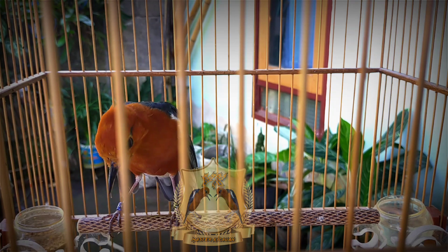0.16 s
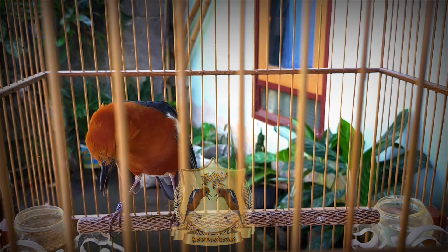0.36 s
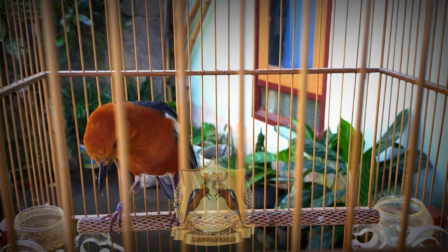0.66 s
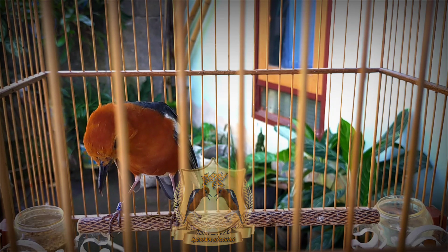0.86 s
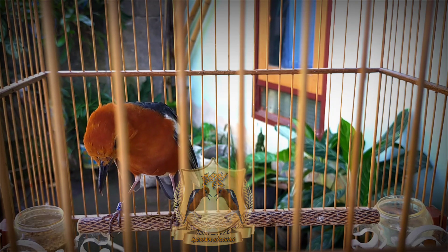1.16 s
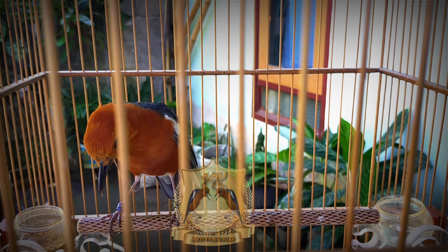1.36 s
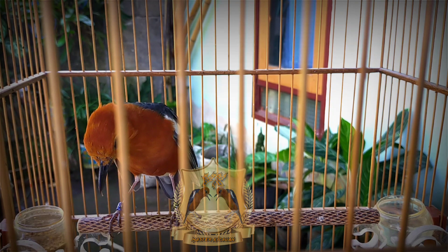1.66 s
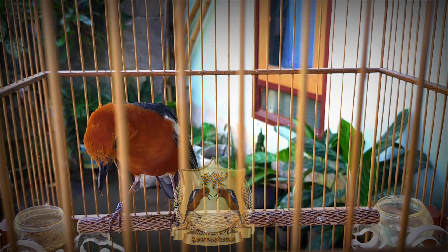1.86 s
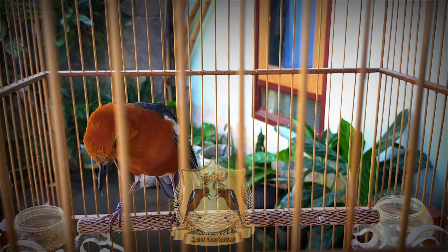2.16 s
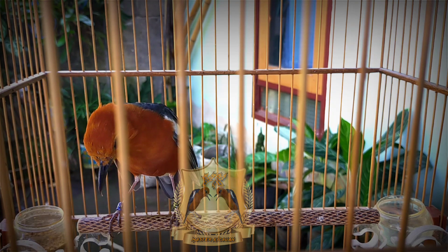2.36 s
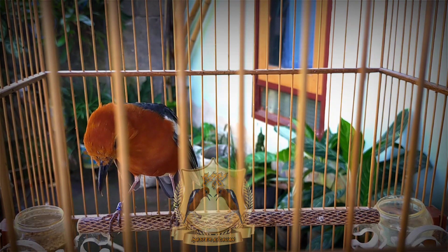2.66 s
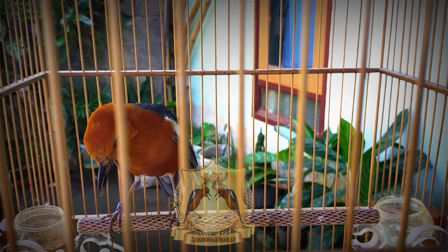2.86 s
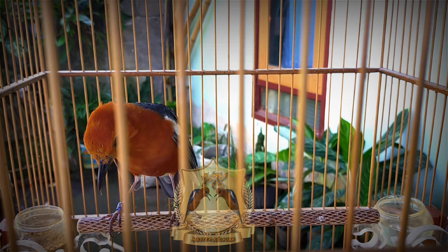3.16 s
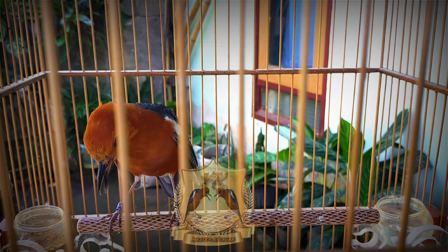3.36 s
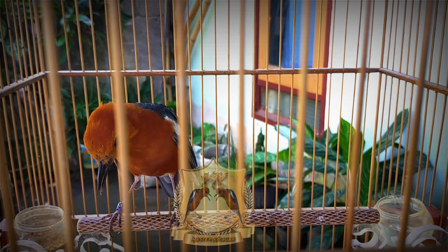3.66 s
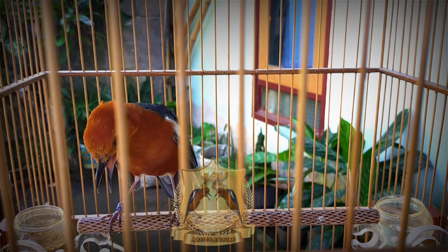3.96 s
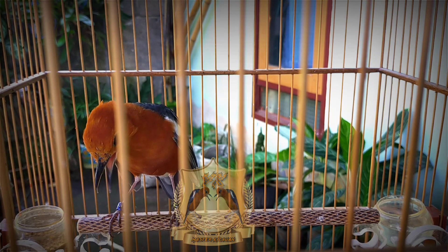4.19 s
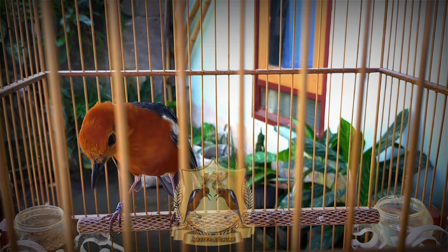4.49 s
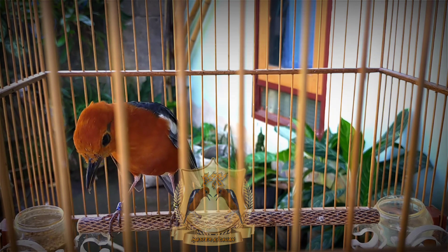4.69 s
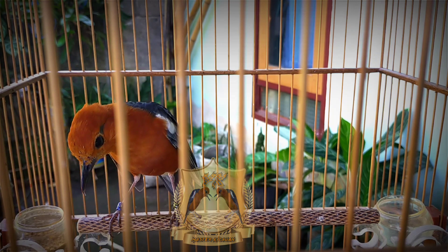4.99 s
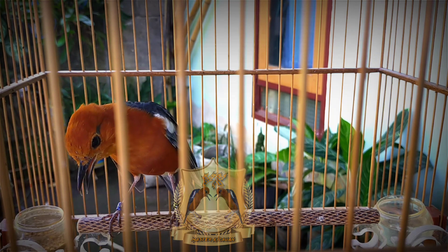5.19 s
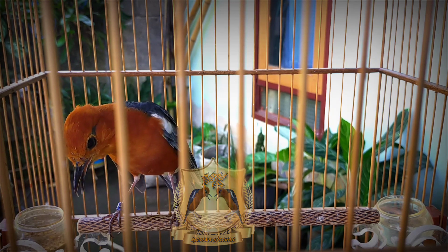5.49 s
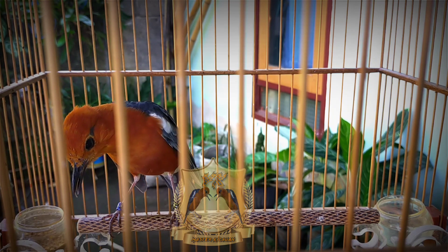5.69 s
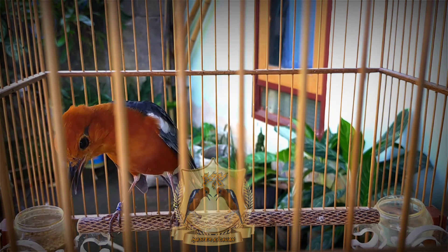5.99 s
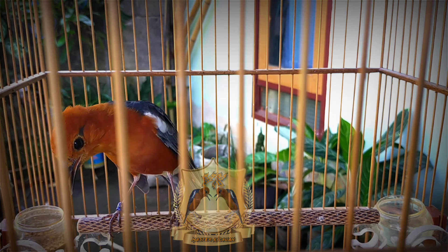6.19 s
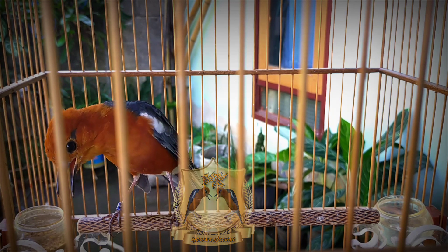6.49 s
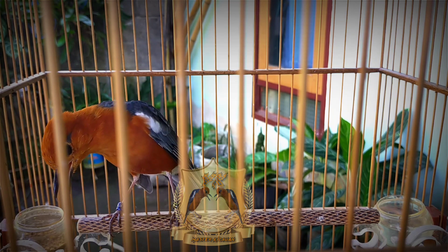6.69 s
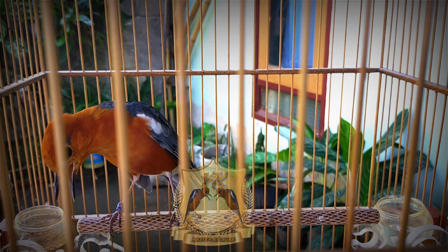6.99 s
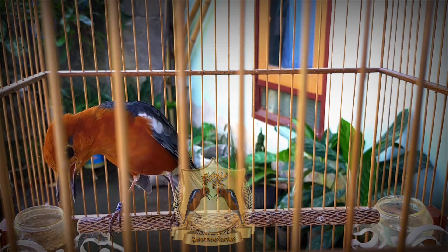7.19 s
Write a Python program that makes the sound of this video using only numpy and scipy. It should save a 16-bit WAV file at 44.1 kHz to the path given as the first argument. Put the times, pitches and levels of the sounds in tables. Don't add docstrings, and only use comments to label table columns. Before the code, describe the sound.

A caged thrush gives one long falling whistle, rests, then sings loud rapid glides and a churring trill over distant roosters and birds.

```python
import sys
import numpy as np
from scipy import signal
from scipy.fft import rfft, irfft
from scipy.io import wavfile
from scipy.ndimage import uniform_filter1d, minimum_filter1d

SR = 44100
rng = np.random.default_rng(int(sys.argv[2]) if len(sys.argv) > 2 else 0)


def how_loud(loudness_db):
    steps = np.asarray(loudness_db, float) / 20
    return 10 ** steps


def file_out(sig):
    cols = np.atleast_2d(sig).T
    lim = np.clip(cols, -1, 1)
    pcm = np.round(lim * 32767).astype(np.int16)
    wavfile.write(sys.argv[1], SR, pcm)


N = 323694

# time in seconds, pitch in Hz, level in dB.
WHISTLE = [(0, 7140, -20), (.042, 6840, -19), (.058, 6810, -11.5), (.116, 6420, -13.5), (.192, 6100, -22),
           (.206, 6030, -12), (.272, 5800, -12.5), (.35, 5670, -19), (.4, 5640, -36)]

# start in seconds, length in seconds,
# first pitch in Hz, second pitch in Hz, level in dB.
SWOOPS = [(2.903, .042, 2777, 6650, -14)]
GRACE_NOTES = [(3.063, 0.021, 6070, 7627, -9), (3.442, 0.017, 8520, 6360, -29),
               (4.02, 0.011, 5350, 6330, -33), (4.187, .01, 7030, 7510, -20),
               (4.351, .008, 7250, 6850, -21), (4.371, .01, 5200, 5650, -33),
               (5.24, 0.014, 3700, 4200, -30), (6.434, 0.011, 8060, 7750, -35.5),
               (6.435, 0.0079, 2950, 2500, -41.5), (6.445, 0.0027, 8200, 7720, -8.5),
               (6.491, 0.0042, 7170, 8085, -13), (6.47, 0.021, 2360, 2450, -52)]
HUMPS = [(3.441, 0.043, 3230, 4937, -13.5)]
DOMES = [
    (3.545, .029, 6300, 7330, -11),
    (3.641, .029, 6500, 7520, -13),
]
STAIRS = [(3.82, .055, 1520, 5870, -14)]
DROPS = [
    (3.904, .015, 3350, 1550, -14),
    (4.076, .013, 4000, 1900, -17),
    (4.251, .015, 3150, 1700, -13),
]
PIPS = [(3.926, .015, 1580, 1660, -32)]
LIFTS = [
    (3.987, .024, 2450, 3800, -9),
    (4.672, .017, 2600, 3650, -9),
    (6.468, .021, 3640, 3660, -11),
]
CLIMBS = [
    (4.159, .029, 2150, 5300, -10),
    (4.326, .026, 2300, 5000, -10),
]
WAVERS = [(4.689, .044, 3305, 3870, -22)]
FALLS = [
    (5.174, .06, 6050, 3300, -5),
    (5.561, .052, 7050, 3300, -7),
]
SLIDES = [
    (5.262, .063, 5800, 3200, -14),
    (5.36, .06, 6500, 3200, -15),
]
SLANTS = [(5.648, .058, 5850, 3200, -14)]
MURMURS = [(5.849, 0.027, 1600, 3340, -37)]
ARCHES = [(5.919, 0.027, 4260, 5300, -12.5)]
HOOKS = [
    (6.04, 0.035, 6900, 4520, -7),
    (6.197, 0.038, 7620, 4700, -7),
]
SCOOPS = [(6.433, .06, 4854, 5790, -11)]
BOUNCES = [
    (6.491, .036, 4050, 4600, -22),
    (6.527, .041, 3700, 4450, -23),
    (6.568, .049, 3370, 4400, -17),
    (6.617, .045, 3000, 4350, -23),
]
TRILL = [
    (6.72, .034, 2550, 1720, -15.5),
    (6.843, .037, 2350, 1680, -15.5),
    (6.967, .036, 2250, 1720, -15.5),
    (7.098, .037, 2400, 1720, -15.5),
]
TAPERS = [(7.247, .043, 2400, 2000, -16)]
# start in seconds, length in seconds,
# first pitch in Hz, second pitch in Hz, level in dB.
SAGS = [
    (5.921, 0.096, 3833, 2230, -19),
    (6.043, .077, 4040, 2192, -16),
    (6.2, 0.079, 4113, 2377, -20.5),
]
# start in seconds, length in seconds, first pitch in Hz, second pitch in Hz, level in dB.
HIGH_GLIDES = [(5.204, .028, 7950, 6800, -17), (5.585, .014, 7900, 7400, -29),
               (6.741, .016, 8000, 7600, -24), (6.858, .022, 8000, 7500, -25),
               (6.981, .022, 8000, 7650, -23), (7.111, .026, 7950, 7700, -20)]

# share of the length, share of the way from first to
# second pitch, level in dB.
SWOOP = [(0, 0, -14), (.1, .15, 0), (.3, .48, 0), (.42, .56, -2), (.6, .84, 0), (1, 1, -2)]
GRACE = [(0, 0.31, -13.5), (0.3, 0.71, 1.5), (1, 1, -6.5)]
HUMP = [(0, 0, -17), (0.169, 0.94, -10), (.4, 1, -2), (1, 0.49, -13.5)]
DOME = [(0, 0, -10), (.1, .6, 0), (.3, 1, -1), (.5, .85, -5), (.75, .1, -11), (1, -1, -20)]
STAIR = [(0, 0, -10), (.18, .23, 4), (.33, .36, 0), (.52, .335, -1), (.64, .46, -10), (.76, .53, -5),
         (1, 1, 6)]
DROP = [(0, 0, -5), (.25, .1, 0), (1, 1, -6)]
GLIDE = [(0, 0, -14), (.2, .3, 0), (.6, .62, -2), (1, 1, -14)]
RISE = [(0, 0, -9), (.22, .58, 1), (.5, .76, -7), (1, 1, -8)]
CLIMB = [(0, 0, -6), (.2, .32, 1), (.44, .43, -6), (.75, .56, -8), (1, 1, -4)]
WAVER = [(0, .5, -4), (.07, -.2, -4), (.18, .45, 1), (.32, -.55, 0), (.48, -.45, -2), (.61, .1, 0),
         (.8, .6, -1), (.9, .93, 2), (1, .3, -12)]
FALL = [(0, .08, -3), (.08, .02, 1.5), (.25, .49, 0), (.45, .71, -5), (.7, .9, -15), (1, 1, -26)]
SLIDE = [(0, 0, -16), (.15, .5, -6), (.27, .66, 0), (.52, .78, 0), (.75, .9, -10), (1, 1, -20)]
SLANT = [(0, 0, -10), (.25, .3, 0), (.45, .58, 0), (.65, .7, -3), (1, 1, -18)]
LIFT = [(0, 0, -11), (.14, 0.28, -7), (0.329, 0.46, 4.5), (.62, 0.8, -11.5), (0.998, 0.88, 13)]
ARCH = [(0, -0.38, -37.5), (0.118, 0.84, -4), (0.299, 0.96, 0.5), (0.601, .8, -18), (0.998, -0.19, -14)]
HOOK = [(0, 0.051, -5.5), (.27, .37, -3.5), (0.599, .43, -5.5), (1.001, 0.91, -21)]
SAG = [(0, 0, -6.5), (0.118, -0.24, 3.5), (0.288, .17, -1), (0.548, .65, -10), (0.998, 0.98, -5.5)]
SCOOP = [(0, .1, -20), (.11, .92, 0), (.3, .17, -5), (.53, -.05, -11), (.8, 0, -6), (.9, .25, -3),
         (1, -.8, -12)]
BOUNCE = [(0, .2, -10), (.08, 0, -13), (.3, .02, -12), (.52, .75, -2), (.8, .82, 0), (.88, 1.08, 0),
          (1, -.1, -8)]
CHURR = [(0, 0, 0), (.18, .33, 1), (.5, .52, 0), (.7, .68, 0), (1, 1, -8)]
TAPER = [(0, 0, -3), (.07, .12, 0), (.3, .5, -6), (.55, .82, 0), (.9, .92, 0), (1, 1, -10)]
FAR_CALL = [(0, 0, -2), (.45, .65, -3), (1, 1, -10)]

# source strength in dB,
# loss in dB per octave away from the favoured pitch.
CLEAR = (4300, [(0, .1)])
HOLLOW = (7500, [(-4, .1), (-30, 18)])
NASAL = (7800, [(4, 22), (0, 95)])
REEDY = (6720, [(-29, 4.5), (2.5, 35.4), (2, 60), (-13, 28)])
BUZZY = (6870, [(-9, 11.9), (8.5, 40.6), (-3, 15), (-8, 3.3)])
OPEN = (6370, [(0, 28.5), (.1, 28)])
SOFT = (6700, [(7.5, 5), (5, 6.3), (-7.5, 10)])
THROATY = (6460, [(-2, .1), (-4.5, 64)])
BRASSY = (6000, [(-12, .1), (-20, .1), (-2, .1), (0, .1), (-6, .1)])
PINCHED = (6900, [(-23, 5), (0, 35), (-2, 45), (-12, 28)])
HUSKY = (7200, [(-4, .1), (-26, 60)])

# time in seconds, peak in dB.
TICKS = [(2.903, -15.5), (3.9908, -19), (4.163, -19), (4.3225, 5), (4.67, 5.5), (5.173, 5), (5.9184, 17.5),
         (6.718, 1), (6.8445, 12.5), (6.9663, -5), (7.1043, -14.5)]

# onset in seconds, 60 dB decay time in seconds, level in dB.
NEAR_ECHO = (0.0012, 0.075, -7)
YARD_ECHO = (0.029, 0.39, -8)
FAINT_ECHO = (0.011, 0.38, -16.5)

# frequency in Hz, density in dB per Hz.
HUM_SPECTRUM = [(12, -40.5), (20, -1), (99, -16), (247, -9.5), (465, -12), (833, -7.5), (1160, -12),
                (1570, -17), (1740, -16), (2610, -27), (3200, -28), (3630, -27.5), (7390, -8.5),
                (8600, -16), (11200, -56.5), (18900, -120)]
# time in seconds, level in dB.
HUM_LEVEL = [(0, -49), (3.4, -46.5), (6.5, -49), (6.8, -42), (7.34, -45)]
# time in seconds, level in dB.
GUSTS = [(0, -76), (.7, -55.5), (2, -55), (2.45, -61), (3.5, -54.5), (4, -69.5), (7.34, -76.5)]
# start in seconds, peak in dB, frequency in Hz.
PUFFS = [
    (1.467, -31, 58.4),
    (1.618, -29, 40.3),
    (2.347, -31, 43.8),
]
# time in seconds, level in dB.
HOARSE_LEVEL = [(0, -49), (.1, -47.5), (.3, -47), (.55, -47.5), (.72, -51), (.78, -64)]
# multiple of the fundamental, level in dB.
HOARSE_PARTIALS = [(2, -6.5), (3, -6.5), (4, -11), (5, -8), (6, -25)]
# start in seconds, length in seconds, depth in dB.
DUCKS = [(0, 0.18, 12), (2.895, 0.12, 8.5), (3.064, 0.14, 21), (3.539, 0.12, 25), (3.652, 0.092, 25),
         (3.827, 0.1, 9), (4.018, 0.086, 15), (4.181, 0.084, 16), (4.335, 0.07, 23), (4.671, 0.095, 25.5),
         (5.921, 0.11, 18), (6.039, 0.14, 7.5), (6.195, 0.11, 9), (6.488, 0.094, 15)]
# start in seconds,
# peak in dB.
CRACKS = [(0, -28), (3.082, -45), (3.654, -42), (3.817, -31), (4.004, -36), (4.022, -39), (4.178, -33.5),
          (4.334, -40), (4.345, -38)]

# start in seconds, length in seconds, first pitch in Hz,
# second pitch in Hz, level in dB.
FAR_BIRDS = [(.12, 0.14, 4250, 3205, -51), (.41, 0.11, 4140, 3120, -50.5), (.686, 0.046, 5800, 3190, -46),
             (.69, 0.03, 4410, 4360, -48), (.78, 0.087, 3320, 4150, -52.5),
             (.945, 0.077, 4890, 4950, -41.5), (1.01, 0.081, 4560, 4330, -42.5),
             (1.06, .07, 4400, 4720, -45), (1.11, 0.08, 4870, 4970, -39), (1.19, 0.041, 4970, 4580, -47.5),
             (1.225, 0.089, 4350, 4194, -51.5), (1.69, 0.14, 3070, 2670, -61.5),
             (1.87, 0.14, 3324, 3295, -55), (5.09, 0.1, 4360, 3510, -46.5)]
# time in seconds, pitch in Hz, level in dB.
FAINT_CROW = [(1.159, 1510, -67.5), (1.42, 1510, -68), (1.472, 1604, -61), (1.85, 1617, -55.5),
              (2.169, 1540, -69), (2.501, 1575, -61.5), (2.899, 1515, -64)]
# start in seconds, length in seconds,
# first pitch in Hz, second pitch in Hz, level in dB.
CROW_TOP = [
    (3.96, 0.03, 1150, 1148, -48.5),
    (4.09, 0.071, 1233, 1152, -50.5),
    (4.42, .18, 1217, 1206, -52),
    (4.85, 0.21, 1197, 1186, -52.5),
]
# time in seconds, pitch in Hz, level in dB, then second and third
# partial in dB relative to the first.
CROW = [(4.24, 744, -66, 0.5, -14), (4.299, 745, -55, 6, -7), (4.371, 745, -60, -12, -18),
        (4.48, 743, -54, 2.5, -12), (4.56, 758, -52, 7, -6.5), (4.65, 776.2, -36.5, -12.5, -21.5),
        (4.76, 770.4, -55, -3.5, -3), (4.862, 773, -49, -12.5, -11.5), (4.941, 752, -51, -3, -26),
        (5.009, 735.5, -43, -4.5, -12), (5.098, 693.7, -39, -14, -21), (5.202, 692.7, -37, -18, -30),
        (5.261, 683, -43.5, -6, -30), (5.309, 674.5, -56.5, 5, -3.5), (5.42, 634, -52, -2, -9)]


def in_time(rows):
    s, *columns = np.transpose(rows)
    return [np.interp(np.arange(N) / SR, s, column) for column in columns]


def drift(rate_hz):
    pole = np.exp(-2 * np.pi * rate_hz / SR)
    noise = rng.standard_normal(N + SR)
    slow = signal.lfilter([1], [1, -2 * pole, pole * pole], noise)[SR:]
    return slow / slow.std()


def notes(tables, wobble, flutter_db, rate, fourth_db=2.0, edge_s=0.0011):
    out, waver, flutter = np.zeros(N), drift(rate), drift(rate)
    release_s = max(edge_s, 0.003)
    for rows in tables:
        s, hz, *levels = np.transpose(rows)
        if len(levels) == 3:
            levels.append(levels[-1] + fourth_db)
        at = np.arange(int(s[0] * SR), min(int(s[-1] * SR), N))
        t = at / SR
        glide = uniform_filter1d(np.interp(t, s, hz), size=90, mode="nearest")
        pitch = glide * (1 + wobble * waver[at])
        phase = 2 * np.pi * np.cumsum(pitch) / SR
        edges = np.clip(np.minimum((t - s[0]) / edge_s, (s[-1] - t) / release_s), 0, 1)
        for k, db in enumerate(levels, 1):
            swell = np.interp(t, s, how_loud(db / 2)) ** 2
            audible = k * pitch < SR / 2
            gain = swell * how_loud(flutter_db * flutter[at]) * edges * audible
            out[at] += np.sqrt(2) * gain * np.sin(k * phase)
    return out


def syllables(rows, gesture, throat=CLEAR):
    share = np.linspace(0, 1, num=40)
    throat_hz, partials = throat
    at, way, swell_db = np.transpose(gesture)
    way, swell_db = np.interp(share, at, way), np.interp(share, at, swell_db)
    tables = []
    for s, length, first_hz, second_hz, db in rows:
        hz = first_hz + (second_hz - first_hz) * way
        levels = []
        for k, (own_db, loss_db) in enumerate(partials, 1):
            octaves_away = np.abs(np.log2(k * hz / throat_hz))
            levels.append(db + swell_db + own_db - loss_db * octaves_away)
        tables.append(np.transpose([s + length * share, hz, *levels]))
    return tables


def opening_whistle():
    return notes([WHISTLE], wobble=0.0012, flutter_db=1.2, rate=60)


def rich_notes():
    rows = syllables(SWOOPS, SWOOP, OPEN) + syllables(STAIRS, STAIR, REEDY)
    rows += syllables(DROPS, DROP, PINCHED) + syllables(PIPS, GLIDE, BRASSY)
    rows += syllables(LIFTS, RISE, REEDY) + syllables(CLIMBS, CLIMB, REEDY)
    rows += syllables(WAVERS, WAVER, REEDY) + syllables(MURMURS, LIFT, SOFT)
    rows += syllables(SAGS, SAG, NASAL)
    return notes(rows, wobble=0.006, flutter_db=3, rate=170, fourth_db=-8)


def syrinx_ticks():
    puffs = rng.standard_normal((len(TICKS), 130))
    fade = np.exp(-np.arange(130) / SR / 0.00034)
    ticks = np.zeros(N)
    for (s, db), puff in zip(TICKS, puffs):
        at = int(s * SR)
        ticks[at:at + 130] = how_loud(db - 19.5) * puff * fade
    return signal.sosfilt(signal.butter(3, 4800, "high", fs=SR, output="sos"), ticks)


def pure_glides():
    rows = syllables(GRACE_NOTES, GRACE) + syllables(HUMPS, HUMP) + syllables(DOMES, DOME)
    rows += syllables(HIGH_GLIDES, GLIDE) + syllables(ARCHES, ARCH)
    rows += syllables(HOOKS, HOOK) + syllables(SCOOPS, SCOOP)
    return notes(rows, wobble=0.004, flutter_db=2, rate=150)


def falling_notes():
    twin_ratio, twin_db = 1.2, -3
    falling = syllables(FALLS, FALL, HOLLOW) + syllables(BOUNCES, BOUNCE, THROATY)
    for rows, gesture in ((SLIDES, SLIDE), (SLANTS, SLANT)):
        twins = [(s, length, first_hz, second_hz * twin_ratio, db + twin_db)
                 for s, length, first_hz, second_hz, db in rows]
        falling += syllables(rows + twins, gesture, HUSKY)
    return notes(falling, wobble=0.012, flutter_db=4, rate=140)


def churring_trill():
    rows = syllables(TRILL, CHURR, BUZZY) + syllables(TAPERS, TAPER, BUZZY)
    return notes(rows, wobble=0.016, flutter_db=4.5, rate=220)


def thrush():
    peak_hz, peak_width_hz, peak_db = 7700, 700, 8
    song = opening_whistle() + rich_notes() + syrinx_ticks()
    song += pure_glides() + falling_notes() + churring_trill()
    lifted = signal.lfilter(*signal.iirpeak(peak_hz, peak_hz / peak_width_hz, fs=SR), song)
    return song + (how_loud(peak_db) - 1) * lifted


def yard(x, tail_db):
    wall_s, wall_db = 0.0058, -13
    slap_s, slap_db = 0.092, -7
    t = np.arange(SR) / SR
    replies = []
    for onset, t60, db in (NEAR_ECHO, YARD_ECHO, FAINT_ECHO):
        tail = rng.standard_normal(SR) * how_loud(-60 * t / t60) * np.clip(t / onset, 0, 1)
        replies.append(how_loud(db + tail_db) * tail / np.linalg.norm(tail))
    near, middle, faint = replies
    near[int(wall_s * SR)] += how_loud(wall_db)
    slap = how_loud(slap_db) * np.roll(middle, int(slap_s * SR))
    return signal.fftconvolve(x, near)[:N], signal.fftconvolve(x, middle + faint + slap)[:N]


def hum():
    hz = np.maximum(np.arange(N // 2 + 1) * SR / N, 1)
    point_hz, point_db = np.transpose(HUM_SPECTRUM)
    colour = how_loud(np.interp(np.log(hz), np.log(point_hz), point_db))
    noise = irfft(rfft(rng.standard_normal(N)) * colour, N)
    return how_loud(in_time(HUM_LEVEL)[0] + drift(1.8)) * noise / noise.std()


def wind():
    out = drift(62) * how_loud(in_time(GUSTS)[0] + 1.4 * drift(1.7))
    t = np.arange(SR // 10) / SR
    for s, db, hz in PUFFS:
        at = int(s * SR)
        out[at:at + len(t)] += how_loud(db) * np.sin(2 * np.pi * hz * t) * np.exp(-t / 0.011)
    return signal.lfilter(*signal.butter(2, 18, "high", fs=SR), out)


def hoarse_crow():
    phase = 2 * np.pi * np.cumsum(321 * (1 + 0.0049 * drift(32))) / SR
    stack = sum(how_loud(db + 4.6 * drift(23)) * np.sin(k * phase) for k, db in HOARSE_PARTIALS)
    band = signal.butter(2, [1200, 1850], "band", fs=SR, output="sos")
    rasp = signal.sosfilt(band, rng.standard_normal(N))
    t = np.arange(N) / SR
    breath = np.clip(t / 0.98, 0, 1)
    return how_loud(in_time(HOARSE_LEVEL)[0]) * (stack + how_loud(13.5) * breath * rasp) * (t < 0.8)


def ducking_db():
    t, out = np.arange(N) / SR, np.zeros(N)
    for s, length, db in DUCKS:
        corners_s = [0, 0.015, length * 0.9, length + 0.021]
        out = np.minimum(out, -db * np.interp(t - s, corners_s, [0.066, 1, 0.58, 0.05]))
    return out


def cracks():
    out, fade = np.zeros(N), np.hanning(100)
    for (s, db), burst in zip(CRACKS, rng.standard_normal((len(CRACKS), 100))):
        at = int(s * SR)
        out[at:at + 100] = how_loud(db) * burst * fade
    return signal.lfilter(*signal.butter(1, 3500, fs=SR), out)


def far_birds():
    return notes(syllables(FAR_BIRDS, FAR_CALL), wobble=0.009, flutter_db=3, rate=50, edge_s=0.006)


def far_roosters():
    crow = [(s, hz, db, db + second_db, db + third_db) for s, hz, db, second_db, third_db in CROW]
    rows = [crow, FAINT_CROW] + syllables(CROW_TOP, FAR_CALL)
    return notes(rows, wobble=0.009, flutter_db=3.0, rate=29, fourth_db=-8.5, edge_s=0.013)


def scene():
    song = thrush()
    early, tail = yard(song, tail_db=-2.0)
    birds, roosters = far_birds(), far_roosters()
    far_echoes = sum(yard(birds + how_loud(-7) * roosters, tail_db=7.5))
    far = how_loud(-3) * birds + roosters + far_echoes
    dip_db = ducking_db()
    background = how_loud(dip_db) * (hum() + wind() + hoarse_crow()) + how_loud(0.72 * dip_db) * far
    dull = signal.sosfiltfilt(signal.butter(6, 6000, fs=SR, output="sos"), tail)
    wash = how_loud(dip_db) * dull + how_loud(0.25 * dip_db + 1) * (tail - dull)
    return (song + early + wash + background + cracks())[None]


def band_limit(x):
    return signal.sosfilt(signal.butter(12, 9180, fs=SR, output="sos"), x)


def record(dry):
    cut = signal.sosfilt(signal.cheby2(16, 55, 8710, fs=SR, output="sos"), dry)
    ceiling = 0.88
    room_left = minimum_filter1d(ceiling / np.maximum(np.abs(cut), ceiling), size=61)
    limited = cut * uniform_filter1d(room_left, size=61)
    return band_limit(limited)


dry = scene()
out = record(dry)
file_out(out)
```